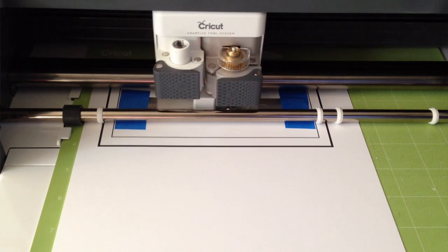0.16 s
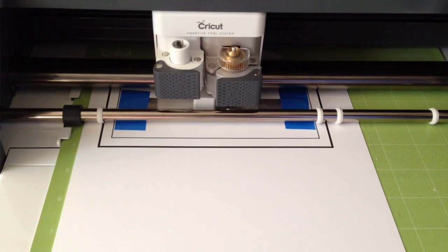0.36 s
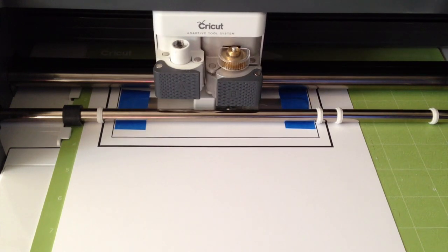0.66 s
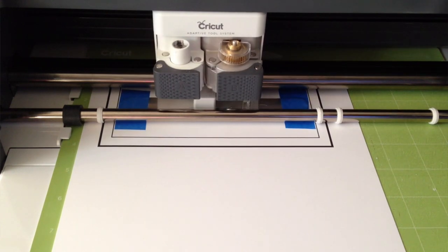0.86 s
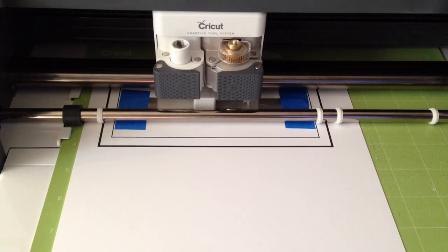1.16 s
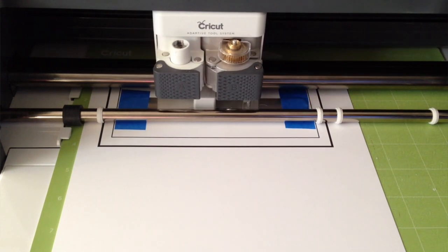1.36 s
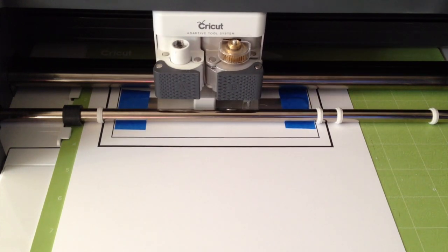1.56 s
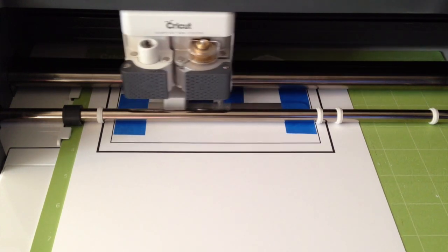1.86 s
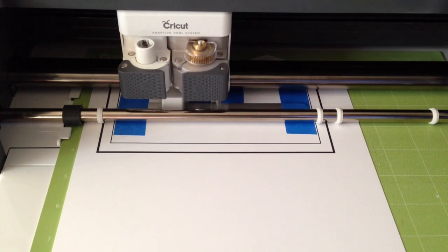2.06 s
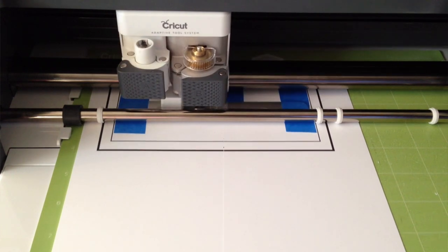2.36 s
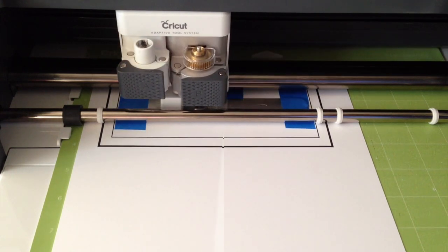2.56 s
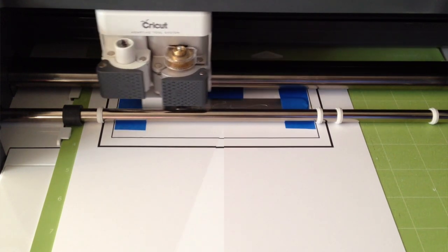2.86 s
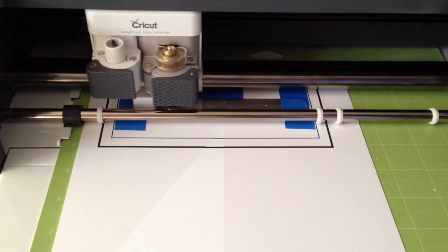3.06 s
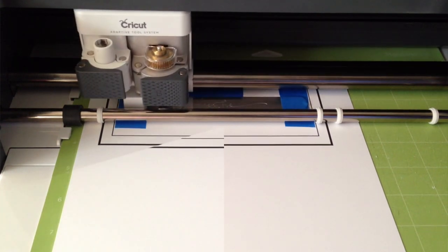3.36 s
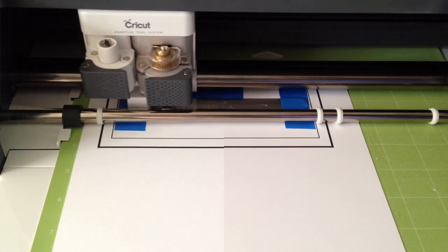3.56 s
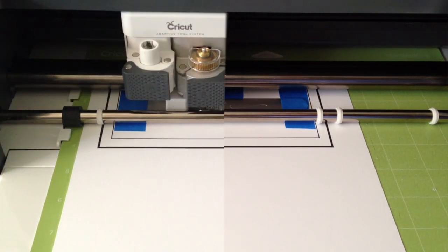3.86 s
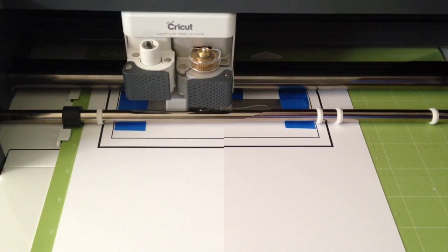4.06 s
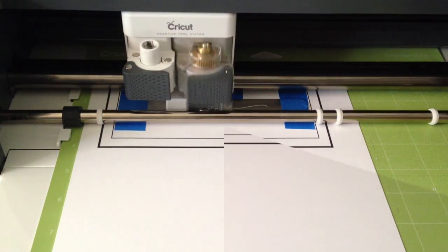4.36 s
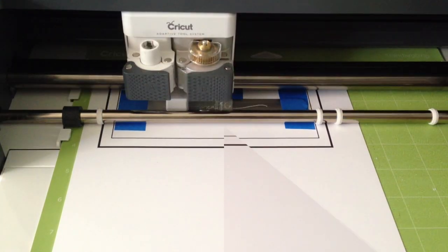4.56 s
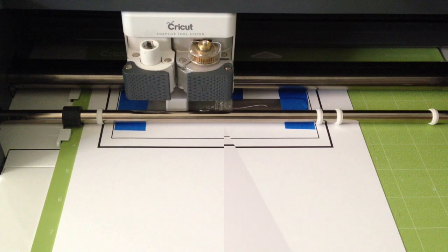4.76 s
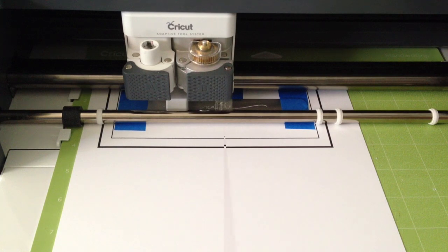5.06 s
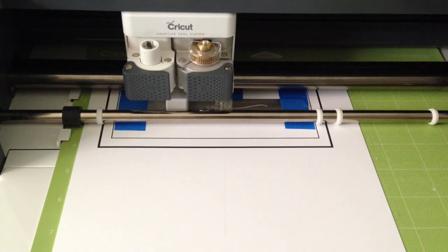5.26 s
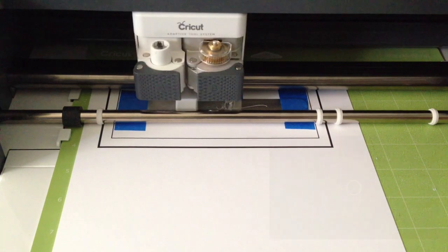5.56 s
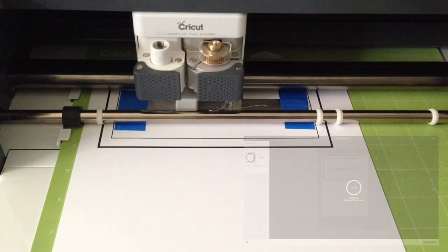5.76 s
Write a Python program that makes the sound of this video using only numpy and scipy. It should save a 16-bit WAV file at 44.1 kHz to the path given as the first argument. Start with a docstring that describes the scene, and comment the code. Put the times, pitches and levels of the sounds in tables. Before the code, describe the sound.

A small craft machine works in stop-start bursts, heard from close by in a quiet room. Three brief gear rasps and one quick carriage whir come in the first half, among clattering knocks from the tool holder. Gritty scrapes, tiny squeaks and rattles of the tip on metal continue over a low roller hum and fade out. A brief, faint hiss with three light clicks closes it.

```python
"""A quiet room, close to a desktop cutting machine engraving a metal blank.
A small geared motor rasps three times as it lifts and lowers the tool. The belt drive shifts carriage and
mat in short runs and one fast traverse; the loose tool holder knocks at the turns while the tip scrapes,
squeaks and snaps over the metal. The machine fades away; a thin hiss and three light clicks end it."""
import sys
import numpy as np
from scipy import signal
from scipy.fft import rfft, irfft
from scipy.io import wavfile
from scipy.ndimage import uniform_filter1d

SR = 44100
rng = np.random.default_rng(int(sys.argv[2]) if len(sys.argv) > 2 else 0)


def wav_out(sig):
    """Save sig, one row per channel (or a flat mono array), as 16-bit PCM at SR to the path in sys.argv[1]."""
    wavfile.write(sys.argv[1], SR, np.round(np.clip(np.atleast_2d(sig).T, -1, 1) * 32767).astype(np.int16))


N = 260190
T = np.arange(N) / SR

# Levels in all tables are relative: each layer adds its own trim.
# spectrum of the room tone: f/Hz, level/dB
ROOM_TONE = [(25, -14), (40, -14.5), (53, -1), (100, -12), (140, -13.5), (205, -4), (250, -20),
             (370, -17.5), (1400, -30), (3000, -24), (3700, -23), (12000, -27.5), (16000, -28)]
# slow moves of carriage and mat: start/s, end/s, stroke/dB, roller rumble/dB, feed hum/dB, hum f/Hz
MOVES = [(0.168, 0.286, -58, -51.5, -55, 165), (0.301, 0.539, -48, -48.5, -53, 167),
         (0.552, 0.594, -60, -51.5, -72, 167.6), (0.654, 0.757, -63, -58, -72, 171.4),
         (0.931, 0.962, -74.5, -52.5, -57.5, 187), (0.989, 1.208, -77, -66, -65.5, 198),
         (1.632, 1.721, -55, -55.5, -52.5, 142), (1.718, 1.992, -54.5, -50.5, -61, 131.3),
         (2.0, 2.082, -68.5, -61.5, -75, 132), (2.376, 2.43, -53, -47, -49.5, 134),
         (2.446, 2.591, -53.5, -55.5, -53, 121.7), (2.597, 2.731, -57.5, -52.5, -56.5, 174),
         (2.727, 3.01, -55.5, -54.5, -69, 139.6), (3.021, 3.206, -64, -56, -82, 133.4),
         (3.229, 3.406, -52, -55.5, -72, 139.8), (3.421, 3.633, -60.5, -54.5, -58.5, 170.7),
         (3.645, 3.747, -65.5, -58.5, -62, 157), (3.75, 4.08, -60, -58, -64.5, 139),
         (4.102, 4.208, -62, -59.5, -61.5, 135.5), (4.224, 4.42, -58.5, -57, -65, 145.4),
         (4.433, 4.696, -56.5, -54, -60.5, 140), (4.711, 5.061, -59, -50, -64.5, 140.1),
         (5.074, 5.569, -59.5, -54.5, -57, 172.3)]
# lift motor runs: start/s, heaviest load/s, end/s, gear rasp/dB, housing drone/dB
LIFTS = [(0.0, 0.042, 0.14, -48, -35.5), (0.733, 0.839, 0.91, -47.5, -43), (2.098, 2.241, 2.38, -50.5, -36)]
# resonances of the tool holder: f/Hz, width/Hz, level/dB
HOLDER_MODES = [(336.3, 31, -5), (445, 95, -4), (577.5, 58, -5), (743, 63, -4.5), (1053, 36, 1),
                (1182, 55, -1.5), (1273.4, 37, 0.5), (1484, 52.6, 6.5), (1526, 165, -0.5), (1650, 59, -13),
                (2343, 18, -14.5), (2478, 34, -3), (3000, 80, -12.5), (3195, 18, -17)]


def undb(db):
    """Decibels to gain."""
    return 10 ** (np.asarray(db) / 20)


def unit(x):
    """Scale to rms 1."""
    return x / np.sqrt(np.mean(x ** 2))


def loudest(x, db, size=441):
    """Set the level of the loudest 10 ms."""
    return x * undb(db) / np.sqrt(uniform_filter1d(x ** 2, size).max())


def peak(x, db):
    """Set the peak level."""
    return x * undb(db) / np.abs(x).max()


def add(out, s, x):
    """Mix x into out at time s."""
    i = max(int(s * SR), 0)
    out[i:i + len(x)] += x[:N - i]


def walk(rate):
    """Smooth random drift of rms 1, changing about rate times a second."""
    hold = int(SR / rate)
    steps = np.repeat(rng.standard_normal(N // hold + 1), hold)
    return unit(uniform_filter1d(steps, hold)[:N])


def series(start, end, gap_s, scatter_db, size=16):
    """Uneven repeats from start to end, as rows of t/s, level/dB."""
    chance = rng.standard_normal((size, 2))
    k = np.arange(size)
    times = start + gap_s * (k + .18 * chance[:, 0] * (k > 0))
    return np.column_stack([times, scatter_db * chance[:, 1]])[start + gap_s * k <= end]


def colour(x, points, size=4096):
    """Minimum-phase EQ through points of f/Hz, level/dB."""
    hz, db = np.transpose(points)
    f = np.maximum(np.arange(size // 2 + 1) * SR / size, 1)
    curve_db = np.interp(np.log(f), np.log(hz), db)
    cepstrum = irfft(np.log(undb(curve_db)))
    cepstrum[1:size // 2] *= 2
    cepstrum[size // 2 + 1:] = 0
    impulse = irfft(np.exp(rfft(cepstrum)))
    return signal.fftconvolve(x, impulse)[:len(x)]


def resonate(x, modes):
    """Ring modes of f/Hz, width/Hz, level/dB; neighbours swing in opposite senses."""
    return sum((-1) ** k * undb(db) * signal.lfilter(*signal.iirpeak(hz, hz / width, fs=SR), x)
               for k, (hz, width, db) in enumerate(modes))


def band(x, lo_hz, hi_hz, order=3):
    """Butterworth band-pass."""
    edges = [lo_hz, min(hi_hz, SR / 2 - 1)]
    return signal.sosfilt(signal.butter(order, edges, "band", fs=SR, output="sos"), x)


def teeth(mesh_hz, scatter_db, grit):
    """Gear teeth meet one by one, each with its own force, and rub as they slide apart."""
    turn = np.cumsum(mesh_hz) / SR
    tooth = turn.astype(int)
    force = undb(scatter_db * rng.standard_normal(N))[tooth]
    impacts = np.diff(tooth, prepend=0) * 1.
    rub = rng.standard_normal(N) * np.exp(-2 * (turn % 1))
    return unit(force * (unit(impacts) + grit * unit(rub)))


def chatter(rise_s, size=6000):
    """A contact rebounds in many tiny impacts, swelling quickly and dying out."""
    t = np.arange(size) / SR / rise_s
    return t * np.exp(-t) * rng.standard_normal(size) * undb(3 * rng.standard_normal(size))


def rattle(rise_s, fall_s, grain_db, size=6000):
    """A loose part seats: a grainy burst that swells to its midpoint and dies away."""
    t = (np.arange(size) - size / 2) / SR
    swell = np.exp(-np.where(t < 0, (t / rise_s) ** 2, t / fall_s))
    return swell * rng.standard_normal(size) * undb(grain_db * rng.standard_normal(size))


def gate(start, end, attack_s, release_s):
    """Envelope of a motor that starts, holds and runs down."""
    return np.clip((T - start) / attack_s, 0, 1) * np.exp(-np.maximum(T - end, 0) / release_s)


def move_gain(column):
    """Envelope of all slow moves, from one level column of MOVES."""
    return np.sqrt(sum((undb(move[column]) * gate(move[0], move[1], attack_s=.014, release_s=.018)) ** 2
                       for move in MOVES))


def traverse_gain():
    """The fast traverse speeds up, cruises and brakes; gear noise grows with the square of its speed."""
    start_s, end_s, speed_up_s, brake_s = 1.695, 1.99, .07, .06
    speed = np.clip(np.minimum((T - start_s) / speed_up_s, (end_s - T) / brake_s), 0, 1)
    return undb(-38.5) * speed ** 2


def lift_gain(column, fall_db_per_s):
    """Envelope from one level column of LIFTS, falling away either side of each heaviest load."""
    return sum(undb(run[column] - fall_db_per_s * np.abs(T - run[1]))
               * gate(run[0], run[2], attack_s=.012, release_s=.029) for run in LIFTS)


def room_air(db):
    """A soft, dark bed of room tone."""
    return undb(db) * unit(colour(rng.standard_normal(N), ROOM_TONE))


def driver_whine(effort):
    """The motor drivers switch with a thin whine that sings louder under load."""
    switch_hz, idle_db, load_db = 15000, -85, -77.5
    tone = np.sin(2 * np.pi * np.cumsum(switch_hz + 12 * walk(90)) / SR)
    sidebands = unit(band(rng.standard_normal(N), switch_hz - 200, switch_hz + 200))
    level = undb(idle_db) + undb(load_db) * (effort / effort.max()) ** .6
    return level * undb(2.5 * walk(15)) * (tone + undb(-4.5) * sidebands)


def closing_hiss():
    """A thin, ringing hiss starts abruptly over a faint rumble and ebbs; three light clicks sit in it."""
    # envelope of the hiss: t/s, level/dB
    envelope = [(5.606, -65), (5.612, -58.5), (5.646, -54.5), (5.786, -63), (5.804, -73), (5.832, -74.5),
                (5.838, -72), (5.9, -80)]
    # its spectrum: f/Hz, level/dB
    hiss_eq = [(2650, -101), (4500, -50.5), (5030, -52), (5250, -16), (5530, -14.5), (5960, -7),
               (6350, -26.5), (6950, -10), (8290, -6.5), (9260, -10.5), (10600, -9.5), (11900, -7),
               (12800, 1.5), (14700, -1.5), (16000, -17.5)]
    # its ringing peaks: f/Hz, width/Hz, level/dB
    shimmer_modes = [(5720, 350, -13), (7700, 280, -1.5), (8620, 320, 2), (11200, 150, -6),
                     (12140, 320, 4.5), (12900, 210, 0), (14300, 250, 0)]
    # light clicks: t/s, peak/dB, body/dB
    light_clicks = [(5.813, -63, -76), (5.828, -49, -61), (5.873, -68, -68.5)]
    level = undb(np.interp(T, *np.transpose(envelope), left=-np.inf))
    shimmer = unit(band(resonate(rng.standard_normal(N), shimmer_modes), 5700, 15500, order=8))
    hiss = unit(colour(rng.standard_normal(N), hiss_eq))
    rumble = unit(band(rng.standard_normal(N), 25, 99, order=1))
    out = level * (undb(-2) * hiss + undb(-4.5) * shimmer) + (level > 0) * undb(-79) * rumble
    for s, db, body_db in light_clicks:
        add(out, s, peak(band(chatter(rise_s=.00086), 5250, 9500), db + .5))
        add(out, s - .001, loudest(band(chatter(rise_s=.00081), 1447, 1525, order=2), body_db - 1.5))
    return out


def rollers():
    """The mat rumbles through the rollers over the feed motor's wavering hum, one pitch for each move."""
    # spectrum of the roller rumble: f/Hz, level/dB
    rumble_eq = [(25, -31), (52, -0.5), (72, -8.5), (105, -6.5), (140, -1), (175, -1.5), (215, -5),
                 (255, -4), (330, -2.5), (450, -9), (570, -5.5), (800, -13.5), (1200, -28), (2500, -61)]
    moves = np.array(MOVES)
    current_move = np.maximum(np.searchsorted(moves[:, 0], T) - 1, 0)
    hum_hz = moves[current_move, -1] * (1 + .06 * walk(70))
    phase = 2 * np.pi * np.cumsum(hum_hz) / SR
    hum = unit(np.sin(phase) + undb(-17.5) * np.sin(2 * phase)) * undb(3.5 * walk(45))
    rumble = unit(colour(rng.standard_normal(N), rumble_eq)) * undb(2.2 * walk(35))
    return undb(-2) * (move_gain(column=3) * rumble + move_gain(column=4) * hum)


def belt_slap(speed):
    """Belt teeth slap the pulley and ring the taut belt."""
    # spectrum of the slaps: f/Hz, level/dB
    slap_eq = [(2500, -21), (3600, -1), (4200, -4.5), (4900, -3.5), (5500, -10.5), (6500, -28), (8500, -20),
               (9400, -6.5), (10500, -27), (15000, -20.5)]
    # resonances of the belt: f/Hz, width/Hz, level/dB
    belt_modes = [(4150, 37, 3.5), (4350, 57, 1.5), (4710, 65, 0.5)]
    slap_hz = 75 * speed * (1 + .11 * walk(40))
    tooth_phase = np.cumsum(slap_hz) / SR % 1
    slaps = np.exp(-1.2 * tooth_phase) * rng.standard_normal(N)
    return unit(unit(colour(slaps, slap_eq)) + undb(-2) * unit(resonate(slaps, belt_modes)))


def tip_scrape():
    """The tip drags over the metal in rapid gritty slips that ring the frame."""
    # resonances of the frame under the tip: f/Hz, width/Hz, level/dB
    frame_modes = [(1050, 22, -4), (1226, 40, 5.5), (1346, 56, -7), (1505, 73, -4.5), (1614, 38, 1),
                   (1960, 80, -8), (2170, 29, -11), (2490, 140, -16), (4860, 200, -25)]
    # spectrum of the scrape: f/Hz, level/dB
    scrape_eq = [(400, -34), (800, -2), (1050, -10.5), (1260, 4), (1420, -7), (1640, -14), (1900, -2),
                 (2200, -12), (2800, -6), (4500, -23), (7000, -32)]
    slips = teeth(420 * (1 + .2 * walk(60)), scatter_db=1.5, grit=3.4)
    return unit(unit(resonate(slips, frame_modes)) + undb(-4) * unit(colour(slips, scrape_eq)))


def belt_drive(slow, fast):
    """Gear teeth ring the frame, faster when louder; gears lead the traverse, scrape the slow strokes."""
    # resonances of the drive: f/Hz, width/Hz, level/dB
    drive_modes = [(1075, 26, -2), (1255, 40, 0), (1365, 35, -5), (1475, 35, -8), (1648, 32, 2),
                   (1890, 50, -12), (2220, 35, -7)]
    # broad response of the frame: f/Hz, level/dB
    frame_eq = [(150, -35.5), (310, -8.5), (450, -26.5), (560, 4), (700, -13), (900, -11), (1100, -2.5),
                (1700, -2.5), (2050, -29.5), (2280, -14.5), (2800, -26.5), (4800, -26.5), (6000, -27.5),
                (14000, -45)]
    rest_hz, cruise_hz = 20, 414.6
    speed = (np.maximum(slow, fast) / fast.max()) ** .3
    mesh_hz = rest_hz + (cruise_hz - rest_hz) * speed * (1 + .025 * walk(60))
    mesh = teeth(mesh_hz, scatter_db=2.2, grit=2.9)
    frame = undb(.5) * unit(resonate(mesh, drive_modes)) + undb(-4) * unit(colour(mesh, frame_eq))
    gears = unit(band(frame, 140, 2400))
    belt = belt_slap(speed)
    stroke = undb(-9.5) * gears + tip_scrape() + undb(-23) * belt
    return fast * (gears + undb(-19.5) * belt) + slow * undb(2.2 * walk(30)) * stroke


def lift_motor(effort):
    """Dry gears rasp and whine, throbbing each shaft turn; under load they slow and the housing drones."""
    # spectrum of the gear rasp: f/Hz, level/dB
    rasp_eq = [(470, -50), (800, -3.5), (1040, -17), (1170, -2), (1760, 1.5), (2000, -17), (2240, -1),
               (2600, -2), (2980, -4.5), (3380, -6.5), (3790, -2), (5870, -14), (8990, -10.5), (15200, -22),
               (16000, -21)]
    # resonances of the lift gears: f/Hz, width/Hz, level/dB
    gear_modes = [(1075, 210, -2), (1767, 45, 10.5), (2536, 60, 6), (3286, 102, 9), (4700, 180, -19),
                  (5370, 46, 2.5), (6000, 460, -20), (7130, 34, -7.5), (7400, 280, -19.5),
                  (8500, 270, -16.5), (9000, 110, -20.5)]
    # resonances of the motor housing: f/Hz, width/Hz, level/dB
    housing_modes = [(310, 58, -20), (563, 23, -9), (629, 20, -19.5), (700.3, 23, -14.5)]
    free_mesh_hz, shaft_hz, sag, load_width_s = 663.5, 26, .14, .04
    load = sum(np.exp(-((T - run[1]) / load_width_s) ** 2) for run in LIFTS)
    mesh_hz = free_mesh_hz * (1 - sag * load) * (1 + .015 * walk(30))
    mesh = teeth(mesh_hz, scatter_db=2, grit=2.2)
    throb = undb(.83 * np.sin(2 * np.pi * shaft_hz * T))
    phase = 2 * np.pi * np.cumsum(mesh_hz) / SR
    whine = unit(np.sin(4 * phase) + np.sin(5 * phase)) * undb(3 * walk(120))
    rasp = unit(colour(mesh, rasp_eq)) + unit(resonate(mesh, gear_modes))
    gears = undb(6.5) * rasp + undb(-4.5) * whine
    groan = np.sin(phase) * undb(2.5 * walk(80))
    housing = unit(band(resonate(mesh, housing_modes), 220, 1400, order=2))
    drone = unit(housing + undb(-3) * groan)
    return effort * throb * gears + undb(-3) * lift_gain(column=4, fall_db_per_s=144) * drone


def holder_rattles():
    """The loose holder rattles lightly while the tip engraves fine detail."""
    blows = np.zeros(N)
    for s, db in series(start=4.3, end=5.5, gap_s=1 / 24, scatter_db=5, size=64):
        add(blows, s, undb(db) * chatter(rise_s=.0036))
    ring = unit(resonate(blows, HOLDER_MODES))
    edge = unit(band(blows, 2030, 3260, order=5))
    return undb(-60.5) * (undb(-2) * ring + undb(-9) * edge)


def holder_knocks():
    """The holder hits its stops; each blow rings its low, middle and high modes and jolts the chassis."""
    # blows on the stops: t/s, body/dB, clack/dB, ring/dB, rise/s
    hits = [(0.046, -40, -47.5, -54, 0.0011), (0.183, -41, -42.5, -42.5, 0.0021),
            (0.197, -34.5, -42, -41, 0.006), (0.268, -46, -43, -53, 0.011),
            (0.306, -43, -39.5, -43.5, 0.0058), (0.331, -37.5, -39.5, -52, 0.0048),
            (0.343, -34.5, -32, -37, 0.0033), (0.387, -48, -53, -56, 0.0067),
            (0.46, -45.5, -35.5, -36.5, 0.0024), (0.47, -39.5, -41, -42, 0.0024),
            (0.496, -42.5, -32, -40.5, 0.0094), (0.525, -41, -34.5, -52, 0.0038),
            (0.541, -45.5, -43, -46, 0.012), (0.663, -65, -61.5, -66.5, 0.0021),
            (0.842, -33, -45.5, -40, 0.014), (1.085, -52.5, -43, -50.5, 0.0092),
            (1.639, -49.5, -57, -62, 0.001), (1.683, -49, -44, -53.5, 0.0047),
            (2.087, -55, -40, -76, 0.0059), (2.241, -40, -62, -44.5, 0.0075),
            (2.539, -51, -41, -55, 0.0073), (2.639, -40.5, -41.5, -41, 0.014),
            (2.662, -45, -41, -45, 0.0095), (2.771, -46, -40, -46.5, 0.012),
            (3.259, -53.5, -36.5, -45, 0.0054), (3.358, -66, -48, -75, 0.0025),
            (3.39, -56, -44, -63, 0.002), (3.401, -53, -47.5, -64, 0.0017),
            (3.495, -53.5, -51.5, -56, 0.014), (3.619, -55.5, -52.5, -50, 0.0018),
            (3.798, -61, -46, -52.5, 0.0086), (3.811, -43.5, -41.5, -37.5, 0.002),
            (4.227, -50, -40.5, -42.5, 0.0059), (4.277, -46, -41, -42, 0.0055),
            (4.336, -53.5, -41, -71, 0.0058), (4.505, -56, -48.5, -46.5, 0.0086),
            (4.547, -53, -45.5, -39, 0.0039), (4.742, -57, -50, -51, 0.01), (4.803, -42, -50, -53, 0.0069),
            (4.837, -57, -41.5, -58, 0.0017), (5.044, -46.5, -41.5, -42.5, 0.0061),
            (5.106, -49, -46, -48, 0.0042), (5.329, -63, -47.5, -59, 0.0058),
            (5.391, -46, -46.5, -50, 0.0036)]
    # spectrum of the chassis thump: f/Hz, level/dB
    jolt_eq = [(45, -40.5), (85, -13), (130, -2), (170, -8.5), (205, -7), (260, -6.5), (330, -2.5),
               (430, -13), (560, -7), (900, -18.5), (2000, -39)]
    out = np.zeros(N)
    for s, body_db, clack_db, ring_db, rise_s in hits:
        blow = rattle(max(rise_s, 1 / SR), fall_s=.0051, grain_db=2)
        knock = resonate(blow, HOLDER_MODES) + undb(-12) * blow
        start = s - len(blow) / 2 / SR - .0012  # the modes take a moment to build up
        add(out, start, loudest(band(knock, 300, 850), body_db - 4.5))
        add(out, start, loudest(band(knock, 950, 2180), clack_db - .3))
        add(out, start, loudest(band(knock, 2100, 3150, order=7), ring_db + .55))
        jolt = colour(chatter(rise_s=.0087), jolt_eq)
        add(out, s - .003, loudest(jolt, body_db - 2))
    return out


def gear_pings():
    """The lift gears take up their play with a bright ping."""
    # gear contacts: t/s, peak/dB
    contacts = [(0.115, -32), (0.714, -42.5), (0.822, -26.5), (2.3105, -32)]
    # resonances of the struck gears: f/Hz, width/Hz, level/dB
    ping_modes = [(3217, 94, -13), (3400, 250, -12), (2570, 310, -19)]
    out = np.zeros(N)
    for s, db in contacts:
        ping = band(resonate(chatter(rise_s=.0028), ping_modes), 3100, 4600)
        add(out, s - .001, peak(ping, db + .5))
    return out


def squeaks_and_ticks():
    """Runs of tiny gritty squeaks from the slipping tip, and a few high ticks from the lift motor."""
    # tip squeaks, and motor ticks in the runs at 2.085 and 2.1445 s:
    # start/s, end/s, spacing/s, peak/dB, f/Hz
    runs = [(0.3, 0.53, 0.1, -47, 7600), (2.085, 2.1, 0.05, -43.5, 8640),
            (2.1445, 2.17, 0.016, -38.5, 8800), (2.372, 2.62, 0.048, -52, 7580),
            (2.736, 2.82, 0.036, -51, 4600), (2.857, 3.04, 0.075, -53.5, 4330),
            (3.15, 3.25, 0.069, -50, 4070), (3.321, 3.39, 0.049, -53, 7600),
            (3.489, 3.58, 0.039, -44, 7310), (4.338, 4.35, 0.048, -49, 4590),
            (4.398, 4.7, 0.041, -56, 7550), (4.831, 4.94, 0.028, -53.5, 7500)]
    out = np.zeros(N)
    for start, end, gap_s, db, hz in runs:
        for s, stray_db in series(start, end, gap_s, scatter_db=4.5):
            burst = rattle(rise_s=.003, fall_s=.005, grain_db=2.5)
            centre_hz = hz * (1 + .028 * rng.standard_normal())
            grit = band(burst, 3500, 9500, order=2)
            blip = band(burst, centre_hz - 420, centre_hz + 420, order=2) + undb(-15) * grit
            add(out, s + .0024 - len(blip) / 2 / SR, peak(blip, db + stray_db - 2.5))
    return out


def tip_snaps():
    """Now and then the tip snaps free, ending in a flurry of small snaps."""
    # hard snaps of tip and clamp: t/s, peak/dB
    hard_snaps = [(0.1935, -36.5), (0.2628, -49), (0.34, -35.5), (0.466, -45.5), (2.122, -45),
                  (2.2369, -35.5), (2.638, -38.5), (3.581, -52.5), (4.264, -49), (4.7186, -53.5),
                  (4.797, -50)]
    # spectrum of a snap: f/Hz, level/dB
    snap_eq = [(1500, -27), (3000, 2), (4700, 0.5), (5600, -5), (6500, -3), (8500, -8.5), (12000, -12.5),
               (15500, -32.5)]
    out = np.zeros(N)
    flurry = [(s, db - 52.5) for s, db in series(start=4.98, end=5.2, gap_s=.043, scatter_db=5.5)]
    for s, db in hard_snaps + flurry:
        snap = colour(rattle(rise_s=.0025, fall_s=.0028, grain_db=2.5), snap_eq)
        add(out, s + .002 - len(snap) / 2 / SR, peak(snap, db + 7))
    return out


def casing(x):
    """The plastic casing radiates everything but a few narrow bands."""
    # dead bands of the casing: f/Hz, width/Hz
    dead_bands = [(915, 30), (2070, 28), (3020, 120)]
    for hz, width in dead_bands:
        x = signal.lfilter(*signal.iirnotch(hz, hz / width, fs=SR), x)
    return x


def scene():
    """Close mono mix: machine and room fade out, leaving a trace of air and the closing hiss."""
    slow, fast, lift = move_gain(column=2), traverse_gain(), lift_gain(column=3, fall_db_per_s=90)
    motors = belt_drive(slow, fast) + rollers() + lift_motor(lift)
    contacts = holder_knocks() + gear_pings() + holder_rattles() + squeaks_and_ticks() + tip_snaps()
    machine = casing(motors + contacts)
    still_air = room_air(db=-101)
    background = room_air(db=-68) + driver_whine(slow + fast + lift)
    fade_start_s, fade_end_s = 2.04, 5.643
    fade = np.cos(np.pi / 2 * np.clip((T - fade_start_s) / (fade_end_s - fade_start_s), 0, 1))
    return (fade * (machine + background) + still_air + closing_hiss())[None]


def record(dry):
    """A steep low-pass cuts the very top."""
    top_hz = 15700
    return signal.sosfilt(signal.ellip(10, .2, 70, top_hz, fs=SR, output="sos"), dry)


dry = scene()
out = record(dry)
wav_out(out)
```